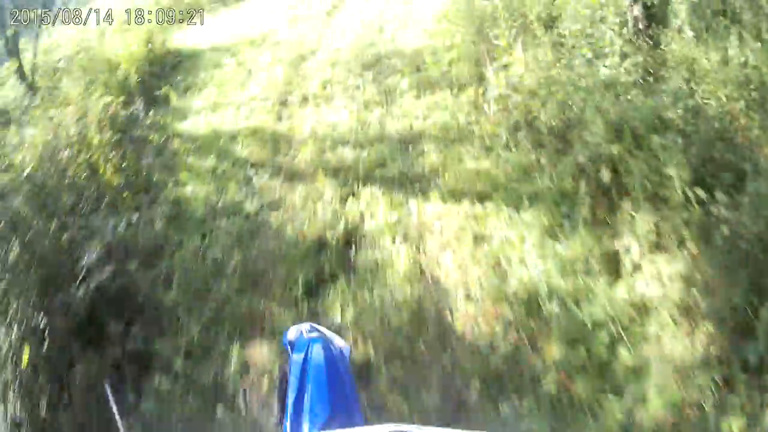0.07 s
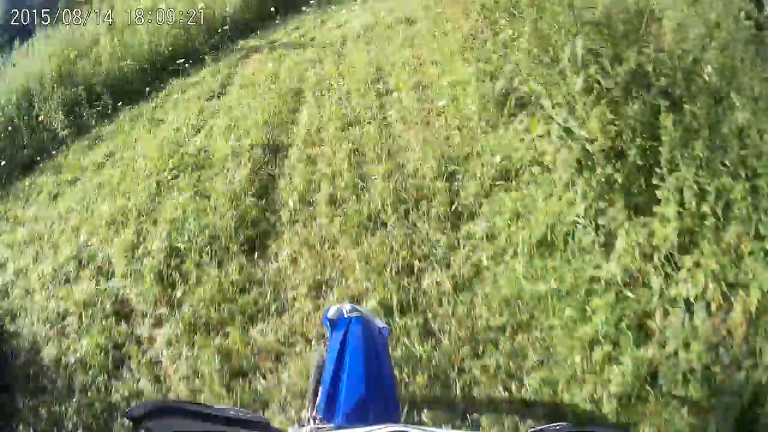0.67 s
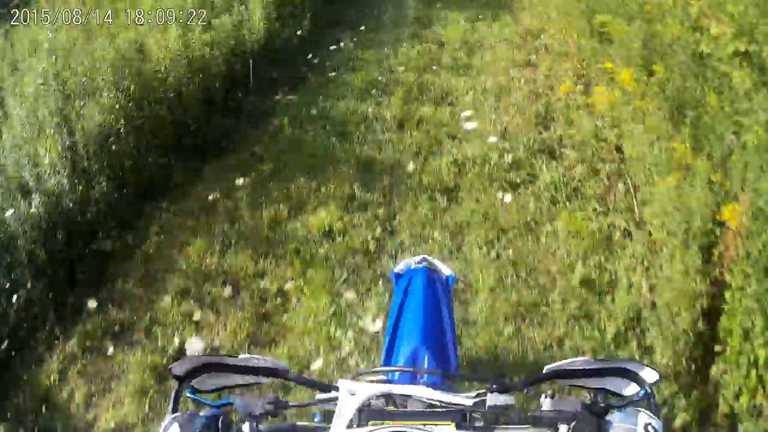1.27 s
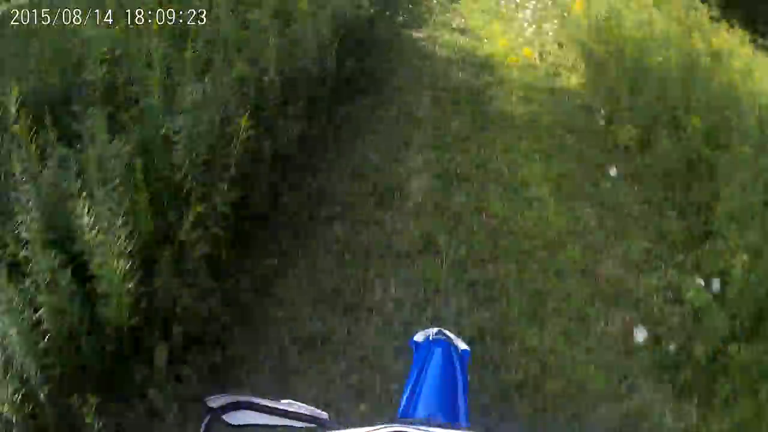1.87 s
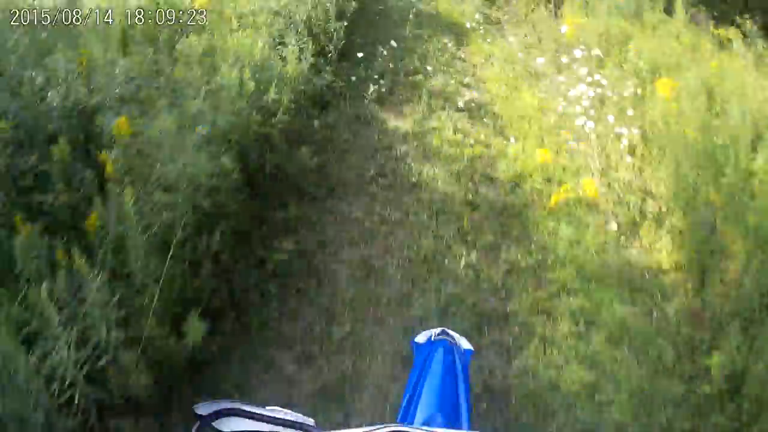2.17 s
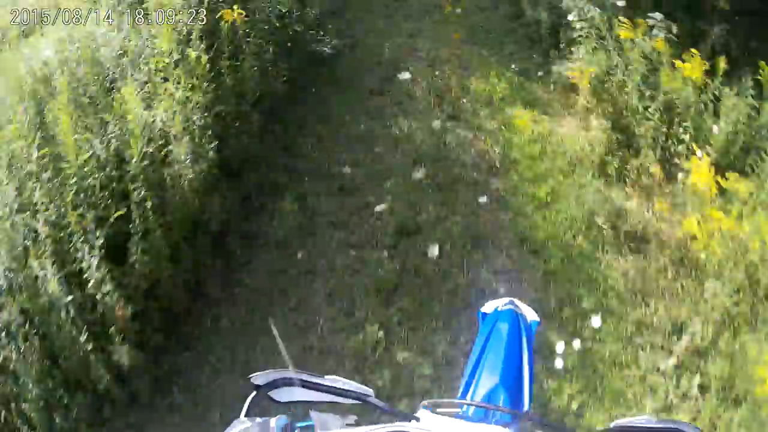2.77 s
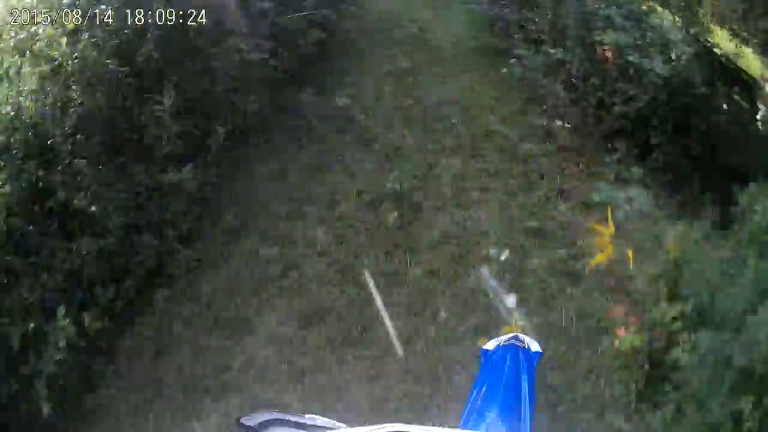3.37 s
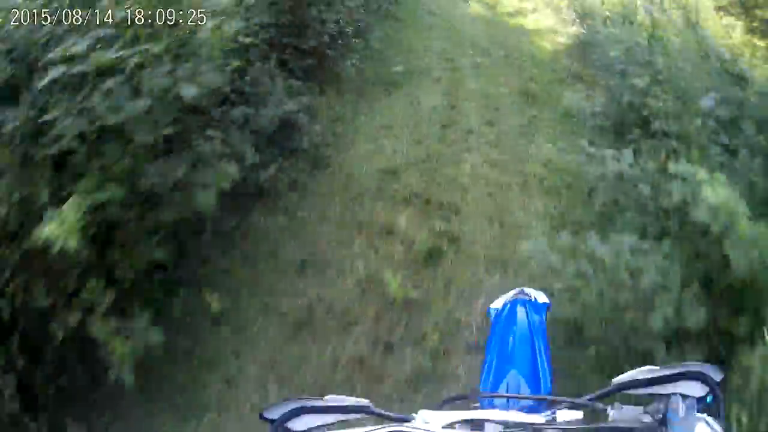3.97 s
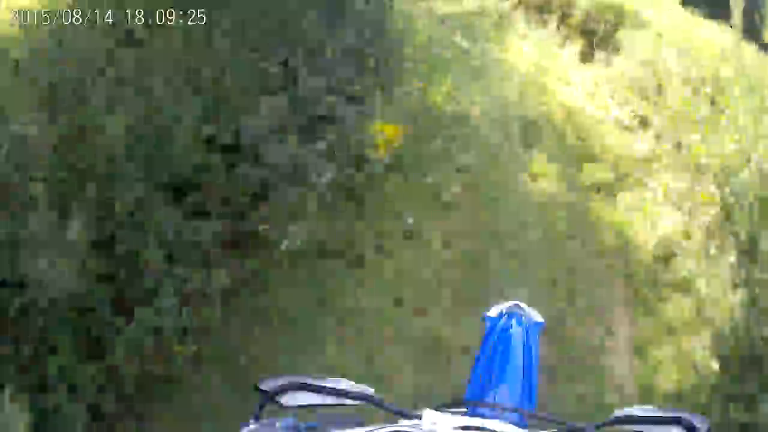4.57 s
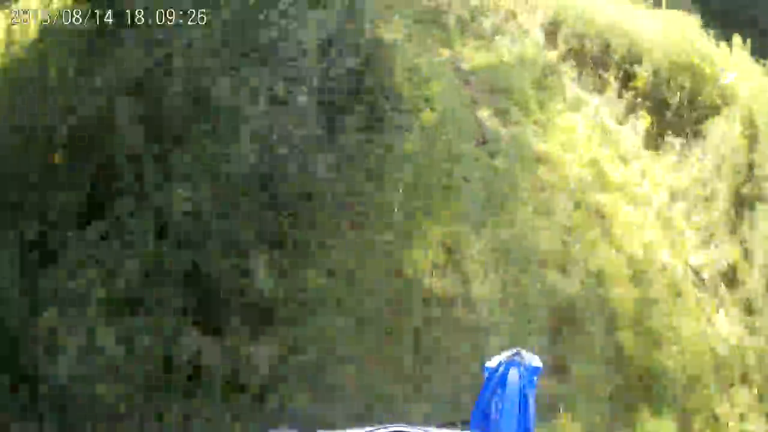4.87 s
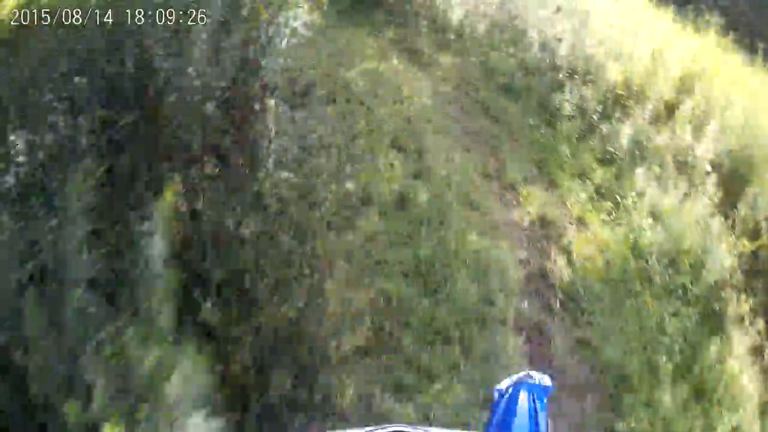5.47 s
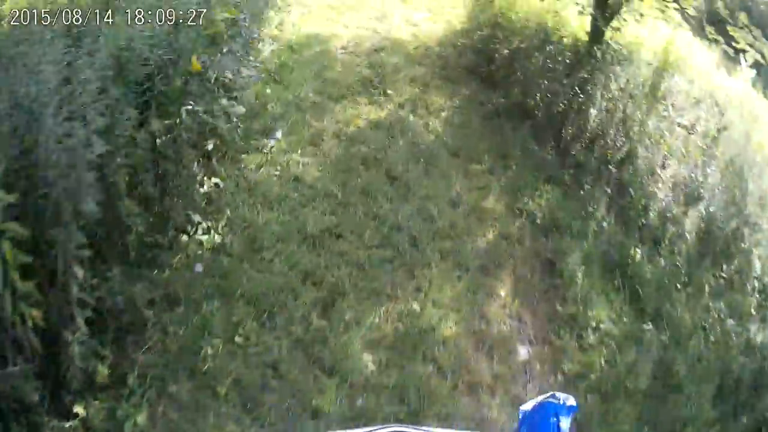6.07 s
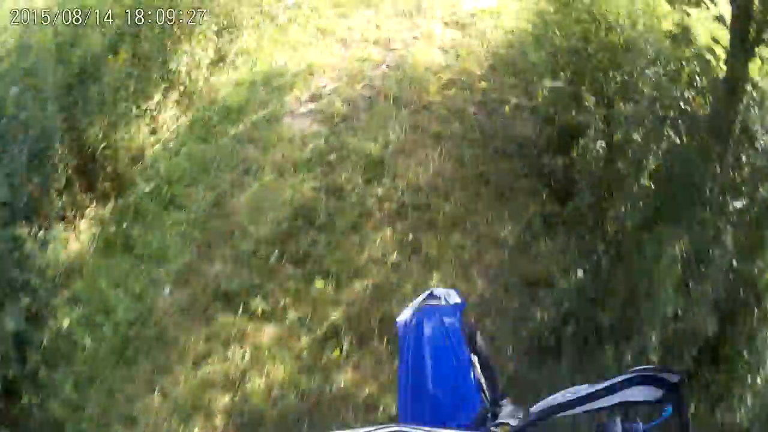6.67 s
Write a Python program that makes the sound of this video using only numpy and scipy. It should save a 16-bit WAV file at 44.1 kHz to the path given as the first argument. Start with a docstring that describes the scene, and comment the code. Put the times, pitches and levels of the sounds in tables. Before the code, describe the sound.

A two-stroke dirt bike rides along a grassy trail, heard from the rider's helmet. It blips, revs up with a hissing rasp, then coasts as the engine slows. Twice more it catches in uneven pops and revs briefly. Grass crackles, stalks tick on the fenders and bumps rattle the chain under faint wind rumble. At the end something knocks hard against the microphone.

```python
"""Dirt bike on a grassy trail

A two-stroke heard from a camera microphone on the rider's helmet: three spells of throttle, the first
a double blip, with long coasting between. Off the throttle the piston only pumps and slaps; the engine
catches in single pops, then fires on every turn with a hissing rasp. Below, grass crackles and stalks
tick on the bike; wind rumbles at the helmet, and at the end something strikes the camera hard."""
import sys
import numpy as np
from scipy import signal
from scipy.fft import rfft, irfft, next_fast_len
from scipy.io import wavfile
from scipy.ndimage import map_coordinates

SR = 44100
rng = np.random.default_rng(int(sys.argv[2]) if len(sys.argv) > 2 else 0)


def write(x):
    x = np.atleast_2d(x).T
    wavfile.write(sys.argv[1], SR, np.round(np.clip(x, -1, 1) * 32767).astype(np.int16))


N = 296793
T = np.arange(N) / SR
CRUISE_HZ = 55  # crank speed from which the octaves of engine speed are counted
SLAP_DB_PER_OCTAVE = 14.5

# exhaust pipe resonances: (frequency [Hz], width [Hz], gain [dB])
PIPE_MODES = [(293.5, 31.6, 6.5), (362, 27, -34), (508.7, 20, 1), (583, 10, -36), (694, 6, -2.5),
              (986, 130, -12), (1266, 8, 4.5), (1440, 7.4, -38)]
# tone colours at the helmet, each (frequency [Hz], gain [dB])
AIRBOX_SPECTRUM = [(60, -25), (200, -46), (290, -3.5), (370, -9), (412, 0.5), (455, 1), (500, 10),
                   (525, -0.5), (565, -13.5), (660, -5.5), (725, -14.5), (850, -24.5), (935, -7),
                   (1080, -27), (1500, -47), (2200, -62)]  # air drawn through the airbox
RASP_SPECTRUM = [(200, -28), (800, -21.5), (1500, -15), (2400, -15), (3100, -11), (3600, -5.5), (4400, 2.5),
                 (5200, -4), (5950, -7), (6700, -1.5), (9500, 2.5), (12800, 6.5), (14200, 3.5),
                 (15700, -18)]  # jets of exhaust gas
CHAIN_SPECTRUM = [(150, -43), (320, -5), (560, -14), (800, -25.5), (1300, -4), (1800, -22), (2550, -25.5),
                  (3050, -4.5), (3450, -10.5), (4100, -1), (4600, 2.5), (5200, -15.5), (6000, -16),
                  (12000, -27)]  # the shaken chain
HISS_SPECTRUM = [(1000, -12), (2400, -36), (3100, -11), (5300, -3.5), (5950, -9), (6600, -1.5), (7800, -2),
                 (9300, -1.5), (11000, -2.5), (13200, 1.5), (14300, -5), (15700, -19)]  # rushing air
RUMBLE_SPECTRUM = [(15, -1.5), (30, -11.5), (60, -16), (150, -14.5), (300, -17.5), (600, -22.5),
                   (3000, -31), (16000, -53)]  # wind and thuds at the microphone


def firing(turns, speed):
    """Just below the rider, each turn under load gives a bang, a gulp of air, a slap and a gas rasp."""
    exhaust, intake, load, rasp = throttle()
    octaves = np.log2(speed / CRUISE_HZ)
    power_band_hz, width_hz = 91.2, 6  # here the pipe comes on song: it shrieks and the rasp flares
    on_song = (1 + np.tanh((speed - power_band_hz) / width_hz)) / 2
    bang = strokes(turns, jitter_s=.00004, scatter_db=.8, rough=.17, t60=.05)
    knock = strokes(turns, jitter_s=.00006, scatter_db=2, rough=.3, t60=.06)
    gulp = strokes(turns, jitter_s=.00004, scatter_db=1.5, rough=.25, t60=.06)
    bangs = unit(ring(bang, PIPE_MODES, low_hz=250, high_hz=1430)) * amp(3 * octaves)
    honk = unit(coloured(gulp, AIRBOX_SPECTRUM)) * (1 - on_song)
    slaps = barrel(knock) * amp(-47.5 + SLAP_DB_PER_OCTAVE * octaves)
    jets = throb(turns, scatter_db=2.5, t60=0.23)
    gas = noise(RASP_SPECTRUM) * jets * amp(12.5 * octaves + 4.5 * on_song)
    high_ring = unit(ring(rng.standard_normal(N), [(4430, 550, 0)], low_hz=3000, high_hz=6000))
    shriek = high_ring * jets * amp(-24) * on_song
    return exhaust * bangs + intake * honk + load * (slaps + shriek) + rasp * gas


def throttle():
    """Exhaust and intake swell as it opens, load and rasp join once every turn fires; shut, all fade."""
    # throttle bursts: (opens [s], fires every turn [s], shuts [s], exhaust [dB], rasp [dB], release [s])
    bursts = [(0.16, 0.211, 0.28, -34, -32.5, 0.04), (0.484, 0.504, 1.068, -34.5, -33.5, 0.031),
              (3.415, 3.717, 3.89, -38, -28.5, 0.036), (6.233, 6.395, 6.52, -36, -26, 0.033)]
    rise_s = 0.0096
    exhaust, intake, load, rasp = np.zeros((4, N))
    for opens, fires, shuts, exhaust_db, rasp_db, release_s in bursts:
        held = (T > opens) * np.exp(-np.maximum(T - shuts, 0) / release_s)
        catching = np.interp(T, [opens, fires], [1, 0])
        running = np.clip((T - fires) / rise_s + 1, 0, 1) * held
        exhaust += amp(exhaust_db - 30 * catching) * held
        intake += amp(-45.5 - 3 * catching) * held
        rasp += amp(rasp_db) * running
        load += running
    return exhaust, intake, load, rasp


def pops():
    """A lone firing booms in the pipe and leaves a short spray of rasp."""
    # single firings: (time [s], rasp [dB], push into the pipe [dB])
    lone_firings = [(0.1978, -26, 12), (3.4172, -22.5, 5), (3.4889, -24.5, 10.5), (3.5222, -30, -8),
                    (3.5708, -25, 9), (3.607, -24, 11.5), (3.662, -23.5, 15.5), (3.6786, -25, 9),
                    (6.1328, -33, 4), (6.206, -31.5, -3), (6.2241, -31.5, 4), (6.298, -29.5, 4),
                    (6.333, -27.5, 8), (6.368, -24.5, 11.5), (6.546, -26.5, 9), (6.6725, -31.5, 1)]
    times, rasp_db, push_db = np.transpose(lone_firings)
    spray = noise(RASP_SPECTRUM) * puffs(times, amp(rasp_db), attack=0.00068, t60=0.18)
    boom = ring(impulses(times + 0.00382, amp(push_db)), PIPE_MODES, low_hz=213, high_hz=1460)
    return spray + boom


def machinery(turns, speed):
    """Firing or not, the piston pumps the airbox and slaps the barrel; the chain clatters, air hisses."""
    push = strokes(turns, jitter_s=.00002, scatter_db=.4, rough=.09, t60=.07)
    knock = strokes(turns + .004, jitter_s=.00004, scatter_db=2.2, rough=.22, t60=.07)
    pump = unit(coloured(push, AIRBOX_SPECTRUM))
    slap = barrel(knock)
    clatter = noise(CHAIN_SPECTRUM) * throb(turns, scatter_db=5, t60=0.62) * amp(0.54 * wobble(300))
    hiss = noise(HISS_SPECTRUM) * throb(turns, scatter_db=1.5, t60=0.25)
    return (pump * by_speed(speed, base_db=-51, db_per_octave=7.5, dip_share=0.34)
            + slap * by_speed(speed, base_db=-51.5, db_per_octave=SLAP_DB_PER_OCTAVE, dip_share=1.66)
            + clatter * by_speed(speed, base_db=-43, db_per_octave=16, dip_share=0.87)
            + hiss * by_speed(speed, base_db=-38.5, db_per_octave=13.3, dip_share=0.9))


def barrel(knocks):
    """Piston slaps pass through the cylinder wall and fins as a metallic ring that comes and goes."""
    # cylinder resonance: (frequency [Hz], width [Hz], gain [dB])
    barrel_modes = [(1308, 108, 0)]
    # swell of the ring: (time [s], level [dB])
    ring_levels = [(0.0, 5.5), (0.3, -1), (0.45, -9), (0.62, 0.5), (1.35, 1.5), (1.9, 5.5), (2.03, 1.5),
                   (2.8, 4.5), (3.3, -2.5), (4.6, 1.5)]
    wall = ring(knocks, barrel_modes, low_hz=1000, high_hz=2800)
    fins = unit(ring(wall, barrel_modes, low_hz=1000, high_hz=2800))
    return fins * amp(curve(ring_levels) + 0.84 * wobble(23.8))  # slaps come in uneven clusters


def strike():
    """Right at the microphone, a hard scraping knock on the camera's shell jolts it with a dull thud."""
    # blows on the camera: (time [s], level [dB])
    blows = [(6.71, -13.5), (6.712, 1), (6.721, 0), (6.726, -3)]
    # shell resonances: (frequency [Hz], width [Hz], gain [dB])
    shell_modes = [(109, 65, -11), (350, 420, -4), (1130, 350, 6.5), (2320, 160, 1), (3020, 480, 5),
                   (4040, 420, 0), (5580, 690, 0.5), (9200, 4600, -1.5), (12300, 3400, -21)]
    times, db = np.transpose(blows)
    scrape = unit(ring(rng.standard_normal(N), shell_modes, low_hz=50, high_hz=14100))
    thud = amp(-31) * noise(RUMBLE_SPECTRUM)
    return (scrape + thud) * puffs(times, amp(db), attack=0.00032, t60=0.031)


def stalks():
    """Stalks and grit tick on the plastic fenders below the rider."""
    # hits on the bike: (time [s], relative level [dB])
    hits = [(0.0767, -12), (0.1068, -17.5), (0.3157, -6.5), (0.3677, -12), (0.377, -9), (0.394, -7),
            (0.4278, -6), (0.4569, -11), (0.488, -13.5), (0.5929, -12), (0.8227, -12), (1.2346, -15),
            (2.0808, -13.5), (2.1025, -16)]
    # fender resonances: (frequency [Hz], width [Hz], gain [dB])
    fender_modes = [(2320, 700, -13), (3260, 1700, -9), (4050, 460, 9), (7500, 2500, -34),
                    (11700, 3000, -10)]
    times, db = np.transpose(hits)
    snap = impulses(times + 0.00099, amp(db + 9))
    splinters = puffs(times + .001, amp(db - 12), attack=.0002, t60=.006) * rng.standard_normal(N)
    return ring(snap + splinters, fender_modes, low_hz=1300, high_hz=14000)


def bumps():
    """Bumps in the trail shake the chain: a short rattle and a longer swish."""
    # jolts to the bike: (time [s], rattle [dB], swish [dB])
    jolts = [(0.077, -31, -56), (1.3498, -38, -33), (1.6444, -48, -30.5), (2.095, -38, -36),
             (2.1375, -32, -33), (4.39, -33, -32), (4.427, -35, -37), (5.1148, -51, -45),
             (5.7618, -57, -48)]
    times, rattle_db, swish_db = np.transpose(jolts)
    rattle = noise(CHAIN_SPECTRUM) * puffs(times, amp(rattle_db), attack=0.0013, t60=0.055)
    swish = noise(HISS_SPECTRUM) * puffs(times, amp(swish_db), attack=0.002, t60=0.15)
    return rattle + swish


def grass(speed):
    """Down at the wheels, blades brush past in a fine crackle, louder at speed and in tall grass."""
    # colour of the crackle: (frequency [Hz], gain [dB])
    blade_spectrum = [(500, -26), (1200, -18), (1900, -5), (2800, -5), (4300, -1.5), (7000, -34),
                      (14000, -55)]
    # patches of tall grass: (start [s], end [s], boost [dB])
    patches = [(0.0, 0.1, 10), (0.26, 0.775, 6)]
    when, strength = rng.random((8000, 2)).T
    blades = impulses(when * N / SR, amp(-5 * np.log(1 - .99 * strength)))
    tall_db = sum(db * np.clip(np.minimum(T - start, end - T) / 0.023 + 1, 0, 1)
                  for start, end, db in patches)
    gain = by_speed(speed, base_db=-55, db_per_octave=19.6, dip_share=0.84) * amp(tall_db)
    return gain * unit(coloured(blades, blade_spectrum))


def wind():
    """Wind buffets the helmet around the microphone in an uneven rumble."""
    # strength of the buffeting: (time [s], level [dB])
    buffet_levels = [(0.0, -52.5), (0.3, -65), (1.5, -55.5), (2.2, -54.5), (3.3, -61), (4.5, -60),
                     (6.0, -64.5), (6.6, -57)]
    return noise(RUMBLE_SPECTRUM) * amp(curve(buffet_levels) + 2.8 * wobble(12))


def crank_hum(revolutions):
    """The crank's first two orders hum faintly under everything."""
    phase = 2 * np.pi * revolutions
    return amp(-65.5) * np.sin(phase) + amp(-73) * np.sin(2 * phase)


def by_speed(speed, base_db, db_per_octave, dip_share):
    """Gain of a part that grows with engine speed and takes its share of the machinery's dips."""
    # machinery noise, dipping while the bike rolls at idle: (time [s], level [dB])
    dips = [(1.65, -0.5), (2.3, -1), (3.35, -0.2), (4.0, 0.5), (4.79, 0.3), (4.87, -5.5), (5.09, -9),
            (5.17, -4), (5.31, -5.5), (5.44, -3), (5.58, -9.5), (6.09, -9), (6.2, -0.5)]
    return amp(base_db + db_per_octave * np.log2(speed / CRUISE_HZ) + dip_share * curve(dips))


def strokes(turns, jitter_s, scatter_db, rough, t60):
    """One push per turn, uneven in time and size, with a turbulent puff; rms 1 at every speed."""
    early_late, weak_strong = rng.standard_normal((len(turns), 2)).T
    times = turns + jitter_s * early_late
    sizes = amp(scatter_db * weak_strong) * np.sqrt(np.gradient(turns))
    gas = unit(puffs(times, sizes, attack=0.0036, t60=t60) * rng.standard_normal(N))
    return unit(unit(impulses(times, sizes)) + rough * gas)


def throb(turns, scatter_db, t60):
    """An envelope of rms 1 that swells once per turn."""
    sizes = amp(scatter_db * rng.standard_normal(len(turns))) * np.sqrt(np.gradient(turns))
    return unit(puffs(turns, sizes, attack=0.0009, t60=t60))


def puffs(times, sizes, attack, t60):
    """An envelope that jumps at each time and dies away; overlapping puffs add in power."""
    t = T[:SR // 2]
    shape = (1 - np.exp(-t / attack)) * amp(-60 * t / t60)
    power = signal.fftconvolve(impulses(times, sizes ** 2), (shape / shape.max()) ** 2)[:N]
    return np.sqrt(np.abs(power))


def impulses(times, sizes):
    """One spike at each time."""
    return np.bincount(np.clip(np.round(times * SR).astype(int), 0, N), sizes, N + 1)[:N]


def ring(x, modes, low_hz, high_hz):
    """x through a body's resonances, with steep skirts outside its band."""
    size = 8192
    f = np.fft.rfftfreq(size, 1 / SR)
    body = sum(amp(db) * 1j * f * width / (hz * hz - f * f + 1j * f * width) for hz, width, db in modes)
    low, high = 1j * f / low_hz, 1j * f / high_hz
    highpass = low ** 2 / (1 + np.sqrt(2) * low + low ** 2)
    lowpass = 1 / (1 + np.sqrt(2) * high + high ** 2)
    return signal.oaconvolve(x, irfft(body * highpass * lowpass)[:size // 2])[:N]


def coloured(x, spectrum):
    """x through a causal filter whose gain follows (frequency [Hz], gain [dB]) points."""
    hz, db = np.transpose(spectrum)
    size = 8192
    f = np.fft.rfftfreq(size, 1 / SR)
    gain = amp(np.interp(np.log(f + 1), np.log(hz), db))
    cepstrum = irfft(np.log(gain))
    causal = np.r_[cepstrum[0], 2 * cepstrum[1:size // 2]]
    return signal.oaconvolve(x, irfft(np.exp(rfft(causal, size))))[:N]


def noise(spectrum):
    """Coloured noise of rms 1."""
    return unit(coloured(rng.standard_normal(N), spectrum))


def wobble(rate):
    """A smooth random curve, rate knots a second."""
    knots = rng.standard_normal(int(N * rate / SR) + 4)
    coarse = T[::16]
    return np.interp(T, coarse, map_coordinates(knots, [coarse * rate]))


def curve(points):
    """One value per sample along (time [s], value) points."""
    return np.interp(T, *np.transpose(points))


def amp(db):
    """Gain for a level in dB."""
    return 10 ** (np.asarray(db) / 20)


def unit(x):
    """x scaled to rms 1."""
    return x / np.sqrt(np.mean(x ** 2) + 1e-20)


def scene():
    """Bike, trail and wind in mono at the helmet; the crankshaft times every stroke."""
    # crankshaft speed: (time [s], speed [turns/s])
    crank_speeds = [(0.0, 60.5), (0.18, 61.8), (0.24, 83.7), (0.28, 85.6), (0.42, 68.3), (0.56, 74.3),
                    (0.65, 75.9), (0.81, 80.9), (0.95, 93.0), (1.02, 100.7), (1.09, 98.4), (1.15, 80.3),
                    (1.25, 75.8), (1.42, 70.5), (1.5, 75.9), (1.62, 78.5), (2.15, 62.0), (2.3, 59.7),
                    (2.45, 55.8), (2.7, 54.3), (3.05, 50.7), (3.38, 49.2), (3.47, 55.5), (3.7, 57.9),
                    (3.86, 63.3), (3.95, 56.8), (4.38, 48.8), (4.85, 46.5), (6.1, 46.5), (6.42, 60.9),
                    (6.51, 67.2), (6.57, 59.1), (6.7, 51.8)]
    speed = curve(crank_speeds)
    revolutions = np.cumsum(speed) / SR
    # start time of each turn, a whole cycle of a two-stroke
    turns = np.interp(np.arange(int(revolutions[-1]) + 1), revolutions, T)
    bike = firing(turns, speed) + pops() + machinery(turns, speed) + crank_hum(revolutions)
    trail = grass(speed) + stalks() + bumps()
    return (bike + trail + wind() + strike())[None]


def record(dry):
    """The helmet camera rounds off the largest peaks and keeps nothing above its band limit."""
    ceiling, top_hz = 0.68, 15750
    rounded = dry[0] / (1 + np.abs(dry[0] / ceiling) ** 4) ** (1 / 4)
    size = next_fast_len(N + SR // 2)
    in_band = np.fft.rfftfreq(size, 1 / SR) < top_hz
    return irfft(rfft(rounded, size) * in_band, size)[None, :N]


dry = scene()
out = record(dry)
write(out)
```